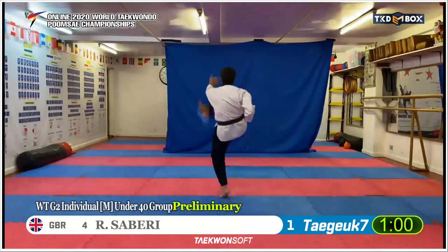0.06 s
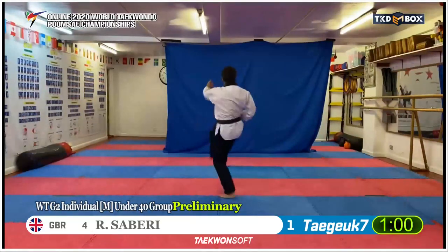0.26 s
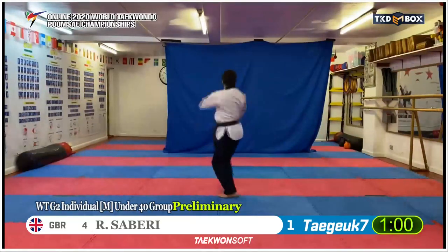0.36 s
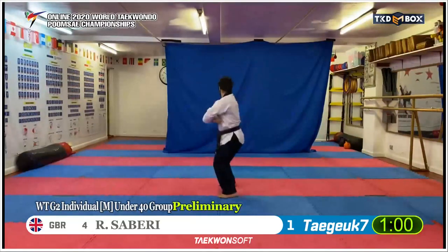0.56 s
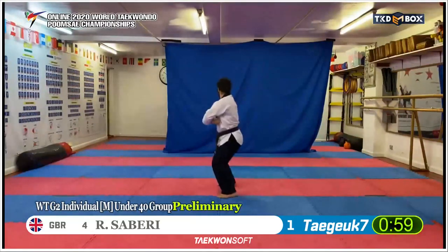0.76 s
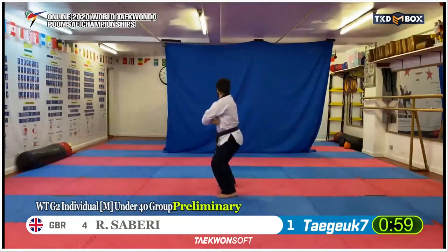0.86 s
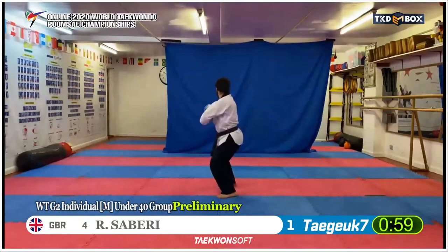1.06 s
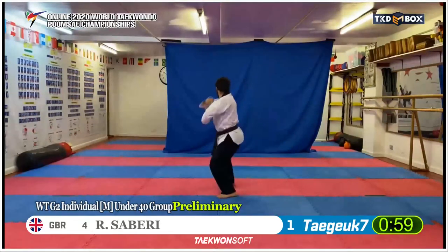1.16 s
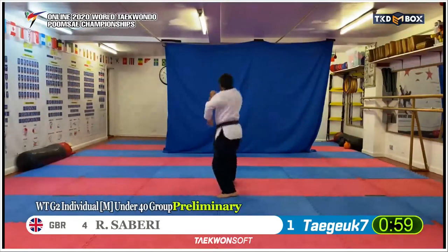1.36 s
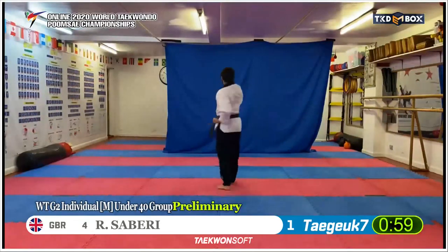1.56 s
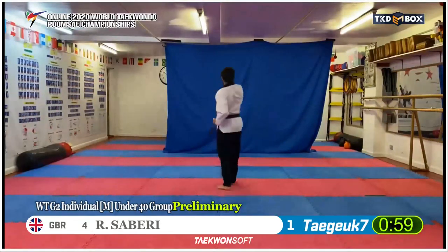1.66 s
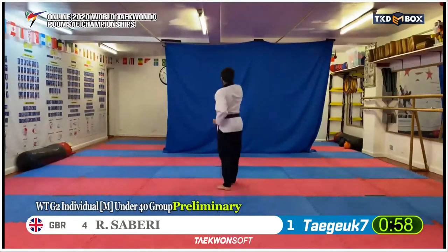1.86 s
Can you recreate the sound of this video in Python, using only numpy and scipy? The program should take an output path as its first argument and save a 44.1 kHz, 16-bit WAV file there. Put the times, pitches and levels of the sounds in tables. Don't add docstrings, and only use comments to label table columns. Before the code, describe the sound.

Heavy cloth snaps in a tight cluster of bright pops near the start, ringing briefly in a hard indoor room, then near quiet, then a faint double rustle and soft foot thud, heard by a stereo microphone in the room.

```python
import sys
import numpy as np
from scipy import signal
from scipy.fft import rfft, irfft, next_fast_len
from scipy.io import wavfile
from scipy.ndimage import uniform_filter1d, map_coordinates

SR = 44100
rng = np.random.default_rng(int(sys.argv[2]) if len(sys.argv) > 2 else 0)


def store_pcm(level_fs):
    pcm = np.round(np.clip(level_fs, -1, 1) * 32767).astype(np.int16)
    wavfile.write(sys.argv[1], SR, np.atleast_2d(pcm).T)


def amplitude_ratio(level_db):
    exponent = np.asarray(level_db, float) / 20
    return 10 ** exponent


N = 83790
BEFORE = SR // 5


def unit(x):
    return x / np.sqrt(np.mean(x ** 2) + 1e-20)


def along(points, hz):
    f, v = np.transpose(points)
    return np.interp(np.log(hz + 1), np.log(f + 1), v)


def filtered(x, response):
    m = next_fast_len(x.shape[-1] + 8192)
    spectrum = rfft(x, m) * response(np.fft.rfftfreq(m, 1 / SR))
    return irfft(spectrum, m)[..., :x.shape[-1]]


def spread(pair, gain):
    # (frequency [Hz], left-right likeness [1 = identical])
    alike = [(50, 0.69), (200, 0.89), (500, 0.14), (1200, 0), (12000, 0.15)]

    def mid_side_gain(hz):
        turn = np.arccos(np.clip(along(alike, hz), -1, 1)) / 2
        return gain(hz) * np.array([np.cos(turn), np.sin(turn)])

    mid, side = filtered(pair, mid_side_gain)
    return np.array([mid + side, mid - side])


def add(track, s, sound):
    track[round(s * SR):][:len(sound)] += sound


def decay(t, db, t60, rise_s):
    return amplitude_ratio(db - 60 * t / t60) * (1 - np.exp(-t / rise_s))


def rings(table, rise_s, rough):
    out, t = np.zeros(N + SR), np.arange(SR // 2) / SR
    for s, db, hz, t60 in table:
        walk = uniform_filter1d(np.cumsum(rng.standard_normal(len(t))), size=12)
        drift = rough * walk * np.sqrt(hz / SR)
        add(out, s, decay(t, db, t60, rise_s) * np.sin(2 * np.pi * hz * t + drift))
    return out[:N]


def rumble():
    # (frequency [Hz], density [dB per Hz])
    colour = [(12, -33.5), (20, -13), (76, -7), (408, -29), (514, -39), (681, -30.5), (1890, -41.5),
              (2850, -48.5), (9000, -66.5), (11700, -97.5), (19800, -120)]
    level_db, surge_db, surges_per_s = -56, 5, 12
    surge = map_coordinates(rng.standard_normal(40), [np.arange(N) * surges_per_s / SR])
    noise = spread(rng.standard_normal((2, N)), lambda hz: amplitude_ratio(along(colour, hz)))
    return amplitude_ratio(level_db + surge_db * surge) * unit(noise)


def footsteps():
    # (time [s], level [dB], pitch [Hz], t60 [s])
    steps = [
        (.21, -25.5, 178.5, 0.16),
        (.212, -29.5, 116.3, 0.2),
        (.24, -34.5, 51.4, 0.48),
        (.62, -40, 61.2, .15),
        (1.2, -31.5, 114.6, 0.075),
        (1.39, -39.5, 55.8, 0.12),
        (1.79, -41.5, 57.5, 0.14),
    ]
    return rings(steps, rise_s=.008, rough=.25)


def brushes():
    # (peak time [s], level [dB], half length [s])
    swells = [
        (.225, -33, 0.019),
        (0.802, -80, .08),
        (0.928, -72.5, 0.045),
        (1.19, -63.5, .012),
        (1.322, -55.5, .025),
    ]
    corner_hz = 8000
    t = np.arange(N) / SR
    air = unit(filtered(rng.standard_normal((2, N)), lambda hz: 1 / (1 + (corner_hz / (hz + 1)) ** 2)))
    return air * sum(amplitude_ratio(db) * np.exp(-((t - s) / half) ** 2) for s, db, half in swells)


def tick():
    corner_hz = 6500
    out, t = np.zeros(N), np.arange(SR // 20) / SR
    thin = lambda hz: (hz < 2 * corner_hz) / (1 + (corner_hz / (hz + 1)) ** 4)
    hiss = unit(filtered(rng.standard_normal(len(t)), thin))
    add(out, .333, decay(t, db=-27, t60=.03, rise_s=0.0018) * hiss)
    return out


def rustle():
    # (time [s], level [dB])
    motion = [(-.1, -50.5), (0, -57), (0.058, -64), (0.171, -61.5), (0.499, -67.5), (.76, -84.5),
              (.89, -67.5), (.93, -65), (.99, -90), (1.168, -75.5), (1.195, -50), (1.252, -49),
              (1.288, -63), (1.315, -46.5), (1.359, -60.5), (1.42, -94), (1.701, -100), (1.9, -100)]
    # (frequency [Hz], density [dB per Hz])
    weave = [(100, -56), (300, -9.5), (700, -12), (1500, -13.5), (3000, -15), (6000, -18.5), (10200, -20.5),
             (15600, -28.5)]
    grains_per_s, grain_db, grain_share = 670, 2.5, 0.22
    n = N + BEFORE
    struck = rng.random(n) < grains_per_s / SR
    size = rng.exponential(size=n)
    grains = unit(struck * amplitude_ratio(grain_db * size) * rng.standard_normal(n))
    hiss = rng.standard_normal(n)
    rub = filtered(hiss + grain_share * grains, lambda hz: amplitude_ratio(along(weave, hz)))
    s, db = np.transpose(motion)
    return unit(rub) * amplitude_ratio(np.interp((np.arange(n) - BEFORE) / SR, s, db))


def slaps():
    # (time [s], level [dB], pitch [Hz], t60 [s])
    modes = [
        (.199, -27, 1990, 0.045),
        (.2165, -10.5, 1081, 0.029),
        (.226, -19, 1145, 0.044),
        (.239, -15, 1321, .05),
        (.267, -17.5, 1250, .05),
        (1.19, -32, 930, 0.031),
        (1.315, -42, 1398, 0.071),
    ]
    return rings(modes, rise_s=0.0013, rough=.7)


def cracks():
    # (time [s], level [dB], brightness [dB per octave], t60 [s])
    bursts = [
        (.19, -40.5, 1.5, 0.24),
        (0.198, -29.5, -3.5, .03),
        (.2165, -15, 1, .018),
        (.305, -34, 0, .03),
        (1.186, -47, -4, .03),
        (0.2214, -17, 3.5, 0.032),
        (0.226, -14, 2.5, 0.021),
        (0.239, -22.5, -7.5, 0.021),
        (.262, -23, 1, 0.056),
        (.268, -20.5, -5, 0.018),
    ]
    # (frequency [Hz], density [dB per Hz])
    snap = [(60, -55), (150, -20), (500, -16.5), (1000, -10), (1700, -17), (2400, -21), (10400, -30.5),
            (15600, -48)]
    # (frequency [Hz], width [Hz], boost [dB])
    folds = [(1250, 110, 0.5), (5340, 770, 5.5)]
    out, t = np.zeros(N + SR), np.arange(SR // 10) / SR
    for s, db, tilt_db, t60 in bursts:

        def colour(hz):
            boost = sum(up * np.exp(-((hz - c) / w) ** 2) for c, w, up in folds)
            return amplitude_ratio(along(snap, hz) + boost + tilt_db * np.log2((hz + 50) / 1000))

        noise = unit(filtered(rng.standard_normal(len(t)), colour))
        add(out, s, decay(t, db, t60, rise_s=0.00027) * noise)
    return out[:N]


def pops():
    # (time [s], level [dB], pitch [Hz], t60 [s])
    pockets = [(.079, -40, 612, 0.064), (.198, -12.5, 619.7, 0.072), (.203, -14.5, 491.6, 0.087),
               (.22, -26, 420, 0.042), (1.012, -43, 327, 0.02), (1.166, -42.5, 460, 0.065),
               (1.184, -29, 580, 0.068), (1.195, -28, 664.5, 0.042), (1.2, -27.5, 400, 0.045),
               (1.218, -29.5, 242, 0.056), (1.245, -34, 796, 0.071), (1.312, -37.5, 285, 0.045),
               (1.33, -34.5, 587, 0.056)]
    return rings(pockets, rise_s=.002, rough=.9)


def hall(x, wet_db):
    # (frequency [Hz], t60 [s])
    t60 = [(60, 0.25), (170, 0.71), (330, 0.96), (550, 0.29), (900, 0.83), (1250, 0.92), (1700, 0.73),
           (3000, 0.66), (5200, 0.62), (12000, .4)]
    first_wall_s, swell_s, lead_s = .003, .004, 4e-5
    hz, t, z = signal.stft(rng.standard_normal((2, SR)), SR, nperseg=512)
    z = z * amplitude_ratio(-60 * t / along(t60, hz)[:, None])
    tail = signal.istft(z, SR, nperseg=512)[1][:, :SR]
    swell = 1 - np.exp(-np.arange(SR) / SR / swell_s)
    tail = spread(tail * swell, lambda hz: 1 + 0 * hz)
    late = np.pad(x, (round(first_wall_s * SR), 0))[None]
    direct = filtered(x, lambda hz: np.exp(1j * np.pi * lead_s * np.outer([1, -1], hz)))
    echo = signal.fftconvolve(late, tail / np.linalg.norm(tail[0]), axes=1)[:, :len(x)]
    return direct + amplitude_ratio(wet_db) * echo


def scene():
    background = rumble() + hall(footsteps(), wet_db=-1.5)
    close = brushes() + tick()
    swish = hall(rustle(), wet_db=6)[:, BEFORE:]
    kick = hall(slaps(), wet_db=1) + hall(cracks(), wet_db=5) + hall(pops(), wet_db=3.5)
    return background + close + swish + kick


def roll_off(x):
    return signal.sosfilt(signal.butter(12, 15740, fs=SR, output="sos"), x)


def record(dry):
    # (frequency [Hz], left over right [dB])
    lean = [(100, 0), (600, 0.1), (1200, 0.8), (5000, 4), (10000, -1.1)]
    notch_hz, notch_width_hz, notch_db, top_hz = 8430, 240.4, -8, 15750

    def ports(hz):
        dip = notch_db * np.exp(-((hz - notch_hz) / notch_width_hz) ** 2)
        return amplitude_ratio(np.outer([.5, -.5], along(lean, hz)) + dip) * (hz < top_hz)

    return roll_off(filtered(dry, ports))


dry = scene()
out = record(dry)
store_pcm(out)
```